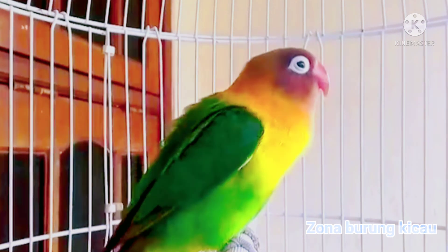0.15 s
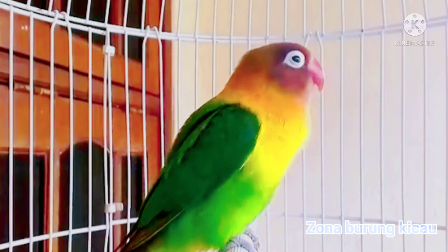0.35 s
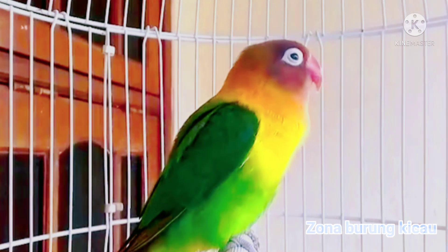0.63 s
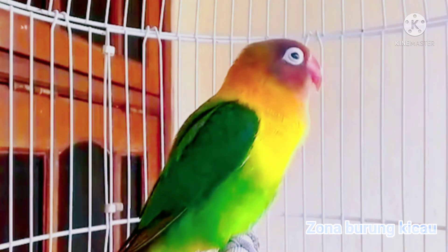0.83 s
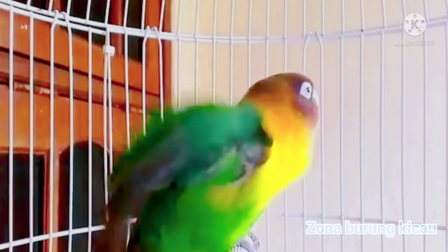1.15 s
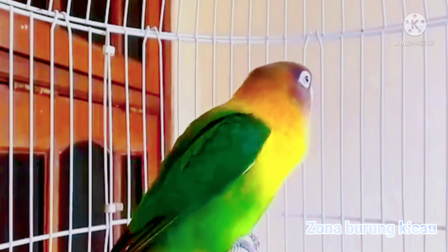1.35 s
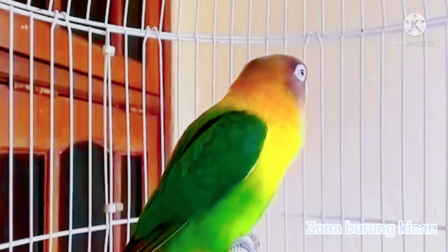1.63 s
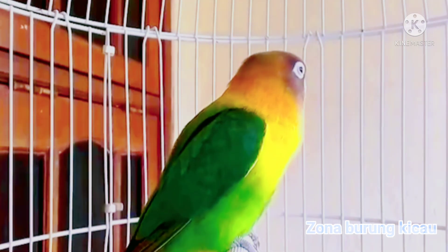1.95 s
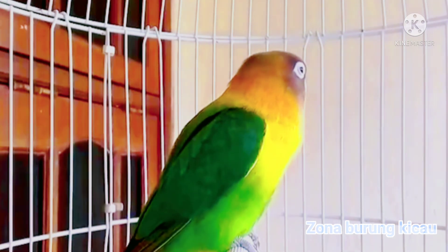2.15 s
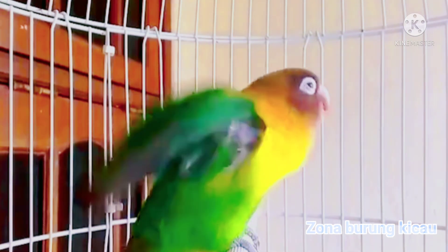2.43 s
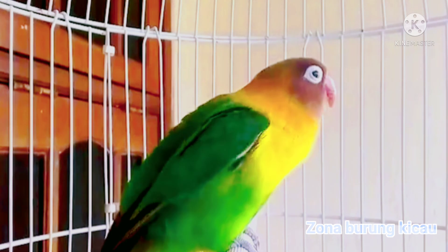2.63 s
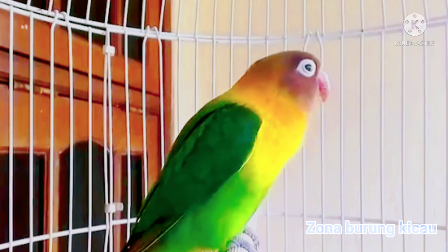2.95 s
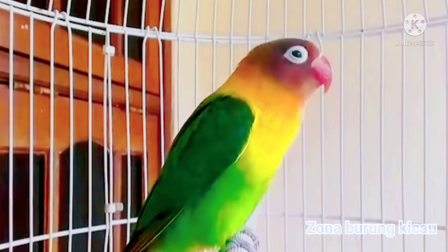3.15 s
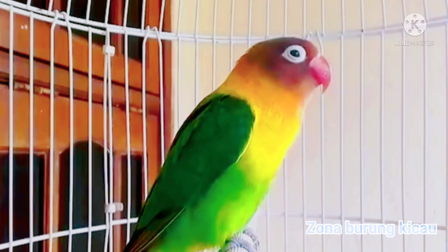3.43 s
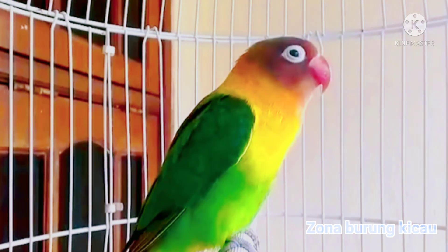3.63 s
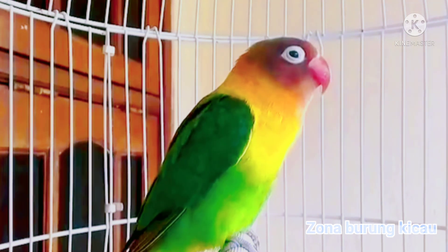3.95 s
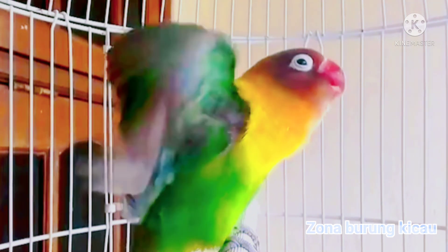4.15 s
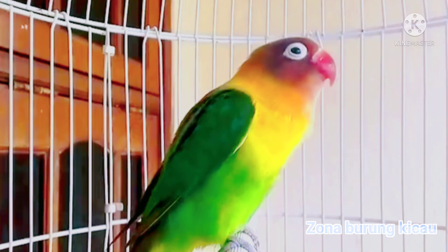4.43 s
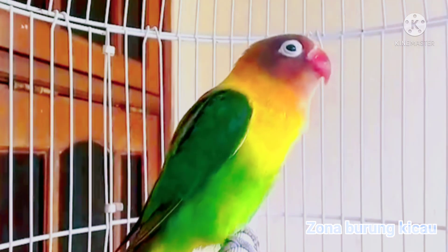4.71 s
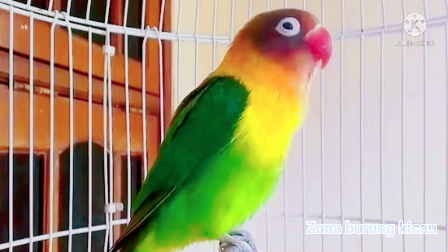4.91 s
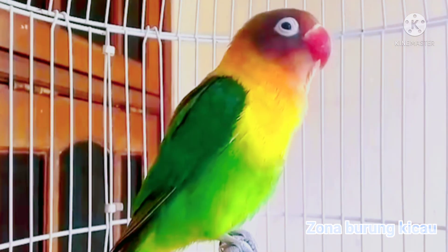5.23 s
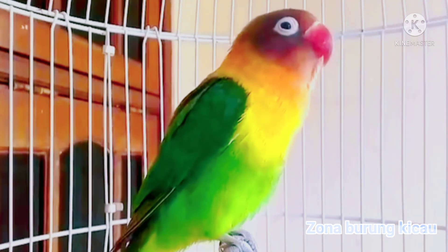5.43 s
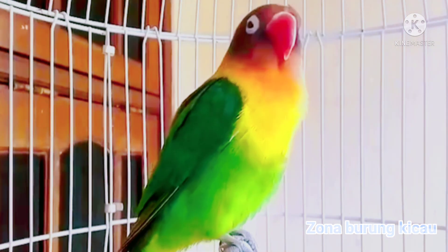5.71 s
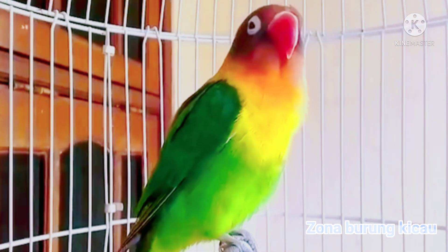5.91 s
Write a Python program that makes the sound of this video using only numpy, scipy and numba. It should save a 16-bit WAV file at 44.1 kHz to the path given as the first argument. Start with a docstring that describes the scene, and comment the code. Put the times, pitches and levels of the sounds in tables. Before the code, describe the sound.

Close up in a small, slightly echoing room, a little caged parrot gives four shrill, spaced chirps, each starting as a pure note and turning raspy. After the third, a cage wire rings faintly and a second bird starts giving thin, distant peeps. The parrot finishes with a single very short, piercing peep. Soft feather rustles, faint bumps and quiet room rumble lie far below the calls.

```python
"""A lovebird in a small room

A caged lovebird chirps loudly four times, close to a phone, and ends with a sharp peep. Its voice
is a vibrating membrane: each chirp is a clear note, then a fluttering rasp that flicks upward, and
three have a soft whine first. Another bird peeps further off, and hard walls echo both. Feathers
swish and a cage wire rings over faint bumps, hoots and rumble. The phone's limiter dips loud peaks."""
import sys
import numpy as np
from scipy import signal
from scipy.fft import rfft, irfft
from scipy.io import wavfile
from scipy.ndimage import uniform_filter1d, minimum_filter1d, map_coordinates
from numba import njit

SR = 44100
rng = np.random.default_rng(int(sys.argv[2]) if len(sys.argv) > 2 else 0)


def unload_audio(sound):
    """Save the sound as a 16-bit wav file, at the path given as the first command line argument."""
    columns = np.transpose(np.atleast_2d(sound))
    # keep every value between -1 and 1, then stretch to whole-number steps
    steps = np.round(np.clip(columns, -1, 1) * 32767)
    wavfile.write(sys.argv[1], SR, steps.astype(np.int16))


N = 267687
T = np.arange(N) / SR

# Roughness runs from 0 (pure) to 1 (hoarse). Voice levels are set before each call's own gain.
# Clear notes that open the chirps: t/s, length/s, grunt/s, push f/Hz, settling/s, held f/Hz,
# rise as a share of pitch, level/dB of harmonics 1, 2, 3
CLEAR_NOTES = [(.083, 0.1, .013, 2847, 0.013, 2450, 0.007, -23.5, -15, -24),
               (1.308, 0.11, 0.0069, 3163, 0.019, 2610, 0.014, -22.5, -22, -20.5),
               (2.658, .102, .005, 3147, 0.022, 2452, -.04, -24.5, -15.5, -24),
               (4.323, 0.099, 0.0097, 2990, .018, 2558, 0.043, -27.5, -25, -25.5)]
# Change over a clear note: level/dB of harmonics 1, 2, 3
NOTE_CHANGE_DB = (5.5, -3, 3.5)
# Rasps that close the chirps: t/s, length/s, dive/s, flick/s, sag as a share of pitch, held f/Hz,
# held roughness, level/dB of harmonics 1, 2, echo time/s
RASP_NOTES = [(0.184, 0.093, 0.018, 0.016, 0.035, 3155, 0.54, -24, -12, 0.33),
              (1.4197, 0.089, 0.0066, 0.0068, 0.016, 3214, 0.5, -22.5, -10.5, 0.33),
              (2.764, .087, .009, 0.015, .06, 3100, 0.37, -29.5, -12, 0.43),
              (4.427, 0.076, 0.01, 0.0081, 0.074, 3510, 0.2, -20.5, -13.5, 0.32)]
# Soft whines: t/s, length/s, time until the break/s, f/Hz before and after it, roughness before it,
# level/dB before and after it
SOFT_WHINES = [(.002, 0.086, 0.043, 2523, 2756, .12, -37, -40.5),
               (1.183, 0.12, 0.11, 2655, 3140, 0.68, -43, -36.5),
               (2.530, 0.18, .042, 2350, 3020, .15, -42.5, -41.5)]
# Low catch of the voice that starts the closing peep: t/s, length/s, f/Hz, roughness,
# level/dB of harmonics 1, 2, 3
VOICE_CATCH = (5.6765, 0.01, 2143, 0.9, -47.5, -41.5, -32)
# Course of the closing peep: t/s, f/Hz, roughness, level/dB
CLOSING_PEEP = [(5.6765, 6410, 0.34, -10.5), (5.680, 6560, 0.08, -15.5), (5.683, 5630, 0.25, -11),
                (5.688, 5564, 0.02, -10), (5.693, 5740, 0.04, -5.5), (5.696, 6710, 0, -13.5)]
# How the throat passes the weak upper harmonics: f/Hz, level/dB
THROAT_COLOUR = [(8000, 15.5), (9000, -1), (10200, 1.5), (11500, -3.5), (12600, -2), (13800, -8),
                 (14800, -14), (15600, -24)]
# Hiss of air in rough notes: f/Hz, relative level/dB
BREATH_COLOUR = [(500, -42.5), (1700, -24), (2600, -7.5), (4000, -1.5), (7400, 3.5), (8800, -12),
                 (11000, -17), (13500, -11.5), (15500, -26)]
# Peeps of the far bird: t/s, length/s, start f/Hz, target f/Hz, roughness, level/dB
FAR_BIRD_PEEPS = [(3.228, 0.016, 7680, 6250, 0, -47.5), (3.242, .024, 7550, 7390, 0.77, -52),
                  (3.244, 0.027, 6020, 5510, 0.44, -54), (4.24, .025, 3930, 3770, 0.1, -64.5),
                  (4.272, 0.03, 4500, 4630, 0.54, -58), (4.281, 0.021, 6030, 5570, .6, -43),
                  (4.985, 0.014, 7330, 7630, 0.5, -50), (4.996, 0.028, 6800, 5720, 0.25, -40),
                  (5.617, .008, 6850, 6700, 0.48, -41), (5.624, 0.022, 5650, 5920, 0.2, -43)]
# Ringing tones of a cage wire: f/Hz, level/dB, time to fade by 60 dB/s
WIRE_TONES = [(4200, -42.5, 0.7), (5351, -52.5, 0.9)]
# Feather swishes and dull bumps: peak t/s, rise/s, fall/s, level/dB
FEATHER_SWISHES = [(1.08, 0.076, 0.19, -55), (4.66, 0.11, 0.17, -51.5), (5.88, 0.066, 0.24, -62.5)]
LOW_BUMPS = [(1.0, .03, 0.08, -58.5), (1.28, 0.024, 0.059, -60), (1.78, 0.069, 0.14, -62),
             (2.64, 0.026, 0.066, -66)]
# Their tone colours: f/Hz, relative level/dB
FEATHER_COLOUR = [(60, -20), (130, -1), (260, 5.5), (650, 1.5), (1100, -3), (1700, -17.5), (4000, -40)]
LOW_BUMP_COLOUR = [(25, -19.5), (55, -2.5), (90, -0.5), (140, -9), (260, -30), (800, -58.5)]
# Far-off hoots: t/s, length/s, highest f/Hz, level/dB
FAR_HOOTS = [(2.25, 0.093, 964, -63.5), (2.37, 0.1, 948, -62.5), (2.576, 0.064, 936, -64.5),
             (2.68, 0.12, 950, -62), (2.94, 0.11, 944, -63.5)]
# Steady rumble and hiss: f/Hz, relative level/dB
BACKGROUND_COLOUR = [(15, -55), (25, -26.5), (136, -3), (221, -1), (253, -4.5), (331, -5.5), (399, -8),
                     (523, -8.5), (1300, -13.5), (1570, -14), (2010, -16.5), (2420, -18), (7100, -23),
                     (9550, -35), (15500, -34)]
# What the walls and cage send back: f/Hz, relative level/dB
ECHO_COLOUR = [(1000, -6.5), (2400, -5.5), (3500, 3.5), (5000, -2), (6500, -2.5), (8000, 3.5), (11000, 2),
               (15000, 2)]

# Stages of a chirp: f/Hz, roughness, level/dB of harmonics 1, 2, 3
GRUNT = (2146, .3, -37, -29, -27.5)
PUSH = (2847, 1, -23, -12.5, -35)[1:]  # each note brings its own push pitch
LEAP = (4372, 1, -8.5, -31, -46)
FLICK = (5076, .76, -15.5, -39, -50.5)
TOP_HZ = 15400  # the treble ends here


def clear_note(start, length, grunt_s, push_hz, settle_s, hz, rise, *harmonic_db):
    """A low grunt, a rough push above the pitch, then a clear wavering tone that lifts and fades."""
    age = ages(length)
    along = age / length - .5
    waver = .0082 * np.sin(2 * np.pi * 36.03 * age)
    end_lift = .04 * np.exp((age - length) / .014)
    pitch = hz * (1 + rise * along + waver + end_lift)
    fade_db = -18 * np.exp((age - length) / .0077)
    levels = [db + change * along + fade_db + 2.5 * wander(age, 90)
              for db, change in zip(harmonic_db, NOTE_CHANGE_DB)]
    pushing = np.exp(-(np.abs(age - grunt_s) / settle_s) ** 3)
    voice = blend((pitch, .05, *levels), (push_hz, *PUSH), pushing)
    voice = blend(GRUNT, voice, smooth_step(age - grunt_s, width_s=.0019))
    return call(np.column_stack([start + age, *voice]), gain_db=3, upper_db=-26.5, breath_db=-17)


def rasp_note(start, length, dive_s, flick_s, sag, hz, rough, first_db, second_db):
    """The pitch tumbles from high up, steadies with a strong octave, then flicks upward."""
    age = ages(length)
    unsteady = np.exp(-(age / .04) ** 4)
    held = (hz, rough, first_db, second_db, -40.5)
    sagging = (hz * (1 - sag), .8, -22, -16.5, -40.5)
    voice = blend(held, sagging, unsteady)
    voice = blend(voice, LEAP, np.exp(-(age / dive_s) ** 1.3))
    pitch, rough, *levels = blend(voice, FLICK, smooth_step(age - length + flick_s, width_s=.003))
    pitch = pitch * (1 + .045 * unsteady * wander(age, 700))
    attack_db = -11.5 * np.exp(-age / .001)  # the rasp takes an instant to speak
    levels = [db + attack_db + 2 * wander(age, 250) for db in levels]  # each flickers on its own
    course = np.column_stack([start + age, pitch, rough, *levels])
    return call(course, gain_db=4.5, upper_db=-25.5, breath_db=-17)


def whine(start, length, break_s, hz, broken_hz, rough, db, broken_db):
    """A soft note swells, then breaks into a higher, hoarse one."""
    age = ages(length)
    level = db - 11 * np.exp(-age / .02)
    steady = (hz, rough, level - 12.5, level, level - 5)
    broken = (broken_hz, 1, broken_db - 10, broken_db + 1.5, broken_db - 13.5)
    voice = blend(steady, broken, smooth_step(age - break_s, width_s=.011))
    return call(np.column_stack([start + age, *voice]), gain_db=-1, upper_db=-21, breath_db=-5)


def catch(start, length, *voice):
    """An instant of low, rough voice."""
    course = [(start, *voice), (start + length, *voice)]
    return call(course, gain_db=-7.5, upper_db=-15, breath_db=-20.5)


def call(course, gain_db, upper_db, breath_db):
    """Three strong harmonics (multiples of the pitch), weak upper ones, and air hiss when rough."""
    span, gate, (hz, rough, *harmonic_db) = trace(course)
    rough = np.clip(rough, 0, 1)
    phase, strength = membrane(T[span], hz, rough, flutter_hz=315.7, depth=.094, jitter=.035, shake=.4)
    harmonics = undb(harmonic_db)
    effort = np.sqrt(np.sum(harmonics ** 2, axis=0))
    tone = sum(gain * np.sin(k * phase) for k, gain in enumerate(harmonics, 1))
    for k in range(4, 7):
        throat_db = np.interp(k * hz, *np.transpose(THROAT_COLOUR))
        gain = effort * undb(upper_db + throat_db - .32 * (k - 1.5))
        tone += gain * (k * hz < TOP_HZ) * np.sin(k * phase)
    breath = effort * rough * undb(breath_db) * noise(BREATH_COLOUR, size=len(span))
    out = np.zeros(N)
    out[span] = gate * strength * (np.sqrt(2) * tone + breath) * undb(gain_db)
    return out


def membrane(t, hz, rough, flutter_hz, depth, jitter, shake):
    """The bird's voice is a vibrating membrane; a fast flutter shakes its pitch and strength."""
    flutter = np.sin(phase_of(flutter_hz * (1 + .25 * wander(t, 200))))
    wobble = depth * flutter + jitter * wander(t, 1500)
    pitch = hz * (1 + rough * wobble + .002 * wander(t, 300))
    strength = np.exp(shake * rough * (wander(t, 700) - .099 * flutter - .4))
    return phase_of(pitch), strength


def peep(course, gain_db, octave_db, breath_db):
    """A high, slightly unsteady whistle with a trace of its octave."""
    span, gate, (hz, rough, db) = trace(course)
    phase, strength = membrane(T[span], hz, rough, flutter_hz=304, depth=.1, jitter=.024, shake=.26)
    tone = np.sqrt(2) * (np.sin(phase) + undb(octave_db) * np.sin(2 * phase))
    breath = rough * undb(breath_db) * noise(BREATH_COLOUR, size=len(span))
    out = np.zeros(N)
    out[span] = gate * strength * undb(db + gain_db) * (tone + breath)
    return out


def far_peep(start, length, start_hz, target_hz, rough, db, glide_s=.014):
    """The other bird's thin whistle slides toward its pitch, loudest in the middle."""
    age = ages(length)
    pitch = target_hz + (start_hz - target_hz) * np.exp(-age / glide_s)
    level = db + 4.5 * (np.sin(np.pi * age / length) - 1)
    course = np.column_stack([start + age, pitch, np.full(len(age), rough), level])
    return peep(course, gain_db=-2.5, octave_db=-33.5, breath_db=-28)


def cage_wire(start_s=2.87, waver=.3):
    """A wire, nudged as the bird settles, rings on faintly and unsteadily."""
    age = np.maximum(T - start_s, 0)
    return sum(undb(db - 60 * age / fade_s) * (1 + waver * wander(T, 46)) * np.sin(2 * np.pi * hz * age)
               for hz, db, fade_s in WIRE_TONES)


def puffs(rows, colour):
    """Feather swishes or dull bumps: soft noise that swells and dies away."""
    swell = sum(undb(db) * np.exp(-((T - peak) / np.where(T < peak, rise, fall)) ** 2)
                for peak, rise, fall, db in rows)
    return swell * noise(colour) * undb(2.3 * wander(T, 40))


def hoots(bend=.066):
    """Faint far-off tones, each rising and falling a little."""
    out = np.zeros(N)
    for start, length, hz, db in FAR_HOOTS:
        arch = np.sin(np.pi * np.clip((T - start) / length, 0, 1))
        pitch = hz * (1 + bend * (arch - 1) + .0048 * wander(T, 90))
        out += undb(db) * arch * np.sin(phase_of(pitch))
    return out


def background(noise_db=-62.5, drone_hz=150, drone_db=-73):
    """Low room rumble and a faint wavering drone under thin hiss."""
    strength = 1 + .5 * wander(T, 31)
    drone = strength * np.sin(phase_of(drone_hz * (1 + .044 * wander(T, 25))))
    return noise(BACKGROUND_COLOUR) * undb(noise_db + .5 * wander(T, 2.5)) + undb(drone_db) * drone


def room(sound, tail_db, near_db, fade_s, build_s, treble_fade_s=.29, split_hz=8000):
    """A few echoes off the near wall and cage, then a smooth tail whose treble dies first."""
    t = T[:SR]
    tail = noise(ECHO_COLOUR, size=SR)
    low = signal.sosfiltfilt(signal.butter(3, split_hz, fs=SR, output="sos"), tail)
    echo = low * undb(-60 * t / fade_s) + (tail - low) * undb(-60 * t / treble_fade_s)
    echo *= 1 - np.exp(-t / build_s)
    echo *= undb(tail_db) / np.sqrt(np.sum(echo ** 2))
    delays_s = rng.uniform(.0017, .016, size=8)
    echo[(delays_s * SR).astype(int)] += undb(near_db) / np.sqrt(len(delays_s))
    return sound + signal.fftconvolve(sound, echo)[:N]


def trace(course, attack_s=.0008, release_s=.002):
    """Turn rows of (time, settings) into a call's samples, on-off gate and setting curves."""
    times, *columns = np.transpose(course)
    span = np.flatnonzero((T > times[0] - attack_s) & (T < times[-1] + release_s))
    t = T[span]
    gate = np.clip(np.minimum((t - times[0]) / attack_s, (times[-1] - t) / release_s) + 1, 0, 1)
    return span, gate, [np.interp(t, times, column) for column in columns]


def blend(old, new, share):
    """Move the voice from one setting (pitch, roughness, levels) to another."""
    return [a + (b - a) * share for a, b in zip(old, new)]


def smooth_step(t, width_s):
    """Rise from 0 to 1 as t passes zero."""
    return .5 + .5 * np.tanh(t / width_s)


def ages(length):
    """Seconds since the start of a call."""
    return np.arange(int(length * SR)) / SR


def phase_of(hz):
    """The running angle of a wave with changing pitch."""
    return 2 * np.pi * np.cumsum(hz) / SR


def undb(db):
    """Decibels to gain."""
    return 10 ** (np.asarray(db) / 20)


def noise(colour, size=N):
    """Noise of average power 1, shaped by (Hz, dB) points."""
    hz, db = np.transpose(colour)
    f = np.maximum(np.fft.rfftfreq(size, 1 / SR), 1)
    gains = undb(np.interp(np.log(f), np.log(hz), db))
    shaped = irfft(rfft(rng.standard_normal(size)) * gains, size)
    return shaped / np.sqrt(np.mean(shaped ** 2))


def wander(t, rate):
    """A smooth random curve of size about 1 that changes about rate times a second."""
    gap = max(int(SR / rate), 2)
    points = rng.standard_normal(len(t) // gap + 4)
    return map_coordinates(points, [1 + np.arange(len(t)) / gap], order=3)


@njit
def follow_peaks(sound, attack, release):
    """A level that jumps up with each peak and sinks slowly."""
    out, level = np.empty(len(sound)), 0.
    for i, size in enumerate(np.abs(sound)):
        level += (size - level) * (attack if size > level else release)
        out[i] = level
    return out


def scene():
    """The birds in their room, over the quiet background."""
    loud = sum(clear_note(*row) for row in CLEAR_NOTES)
    loud += peep(CLOSING_PEEP, gain_db=-.5, octave_db=-37, breath_db=-36)
    soft = sum(whine(*row) for row in SOFT_WHINES) + catch(*VOICE_CATCH)
    far = sum(far_peep(*row) for row in FAR_BIRD_PEEPS)
    # the wide-open beak beams the loud calls at the phone; the soft notes carry more of the room
    birds = room(loud, tail_db=-11.5, near_db=-8, fade_s=.36, build_s=.028)
    for *row, fade_s in RASP_NOTES:
        birds += room(rasp_note(*row), tail_db=-11.5, near_db=-7, fade_s=fade_s, build_s=.0099)
    birds += room(soft, tail_db=-9.5, near_db=-6, fade_s=.54, build_s=.008)
    # the far bird arrives mostly by way of the walls
    birds += room(far, tail_db=3.5, near_db=1, fade_s=.48, build_s=.028)
    rustle = puffs(FEATHER_SWISHES, FEATHER_COLOUR) + puffs(LOW_BUMPS, LOW_BUMP_COLOUR)
    return (birds + cage_wire() + rustle + hoots() + background())[None]


def record(dry, ceiling_db=-8.5, attack_s=.00014, release_s=.021):
    """The phone's limiter turns everything down during loud chirps; then the top treble is cut."""
    level = follow_peaks(dry[0], 1 - np.exp(-1 / (attack_s * SR)), 1 - np.exp(-1 / (release_s * SR)))
    gain = 1 / np.maximum(level / undb(ceiling_db), 1)
    gain = uniform_filter1d(minimum_filter1d(gain, size=89), size=89)  # looks ahead for clean starts
    return signal.sosfilt(signal.ellip(10, .1, 80, TOP_HZ, fs=SR, output="sos"), dry * gain)


dry = scene()
out = record(dry)
unload_audio(out)
```